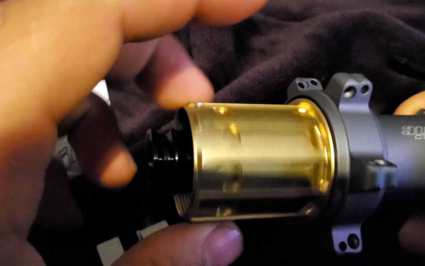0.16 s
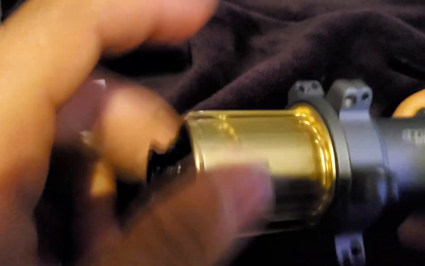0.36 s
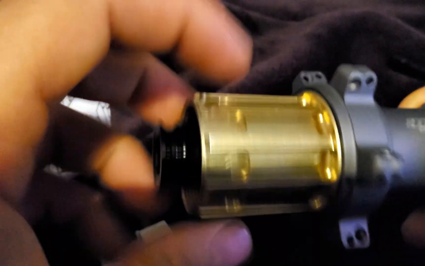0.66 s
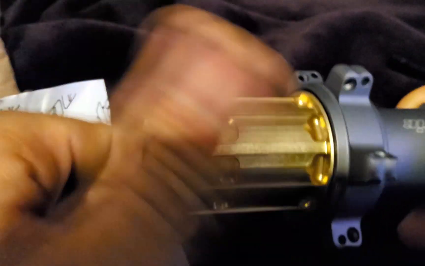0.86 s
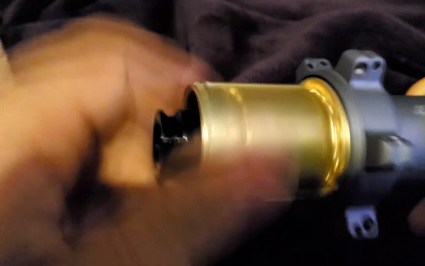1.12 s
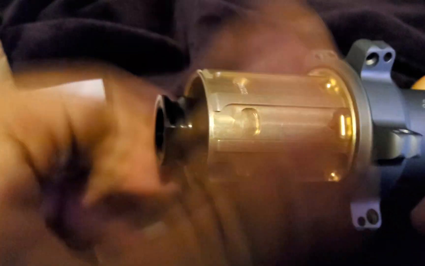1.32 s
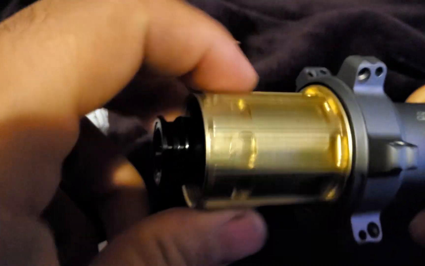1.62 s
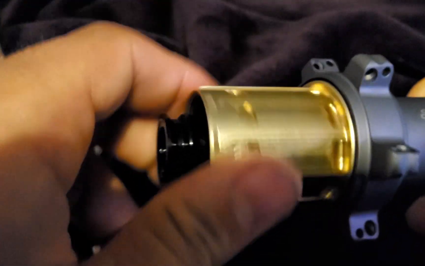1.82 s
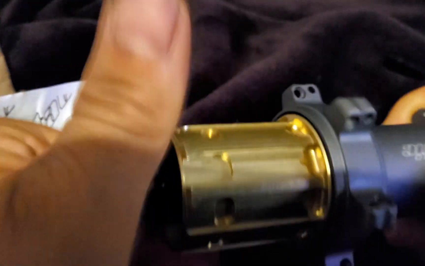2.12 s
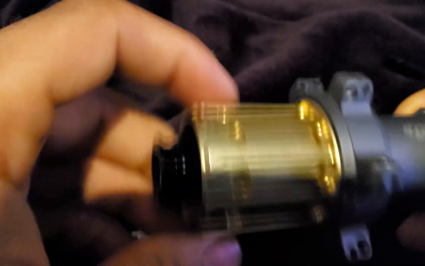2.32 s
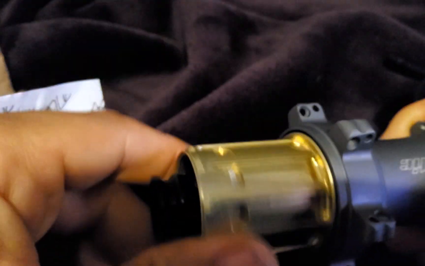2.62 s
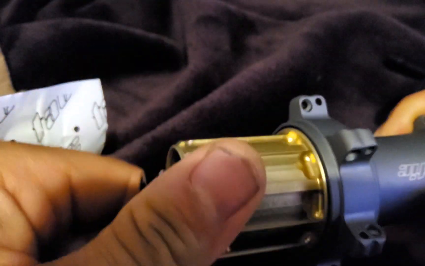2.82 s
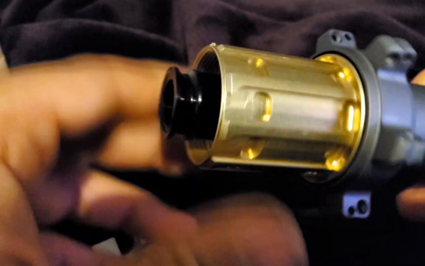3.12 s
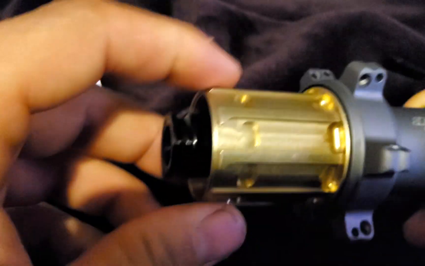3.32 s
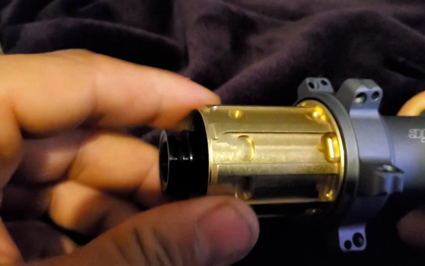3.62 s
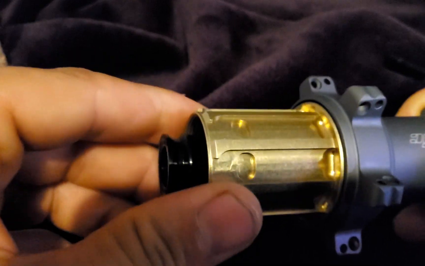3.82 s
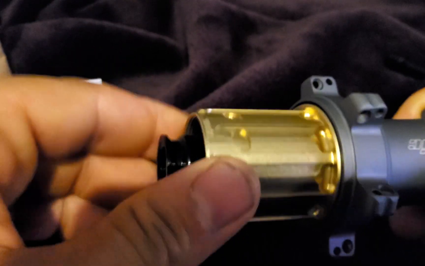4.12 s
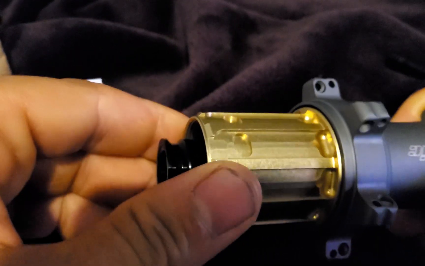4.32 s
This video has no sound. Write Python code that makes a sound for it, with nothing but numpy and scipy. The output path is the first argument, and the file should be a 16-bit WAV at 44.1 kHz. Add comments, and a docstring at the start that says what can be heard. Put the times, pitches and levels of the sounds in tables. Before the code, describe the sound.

Close, bright ratcheting of a bicycle hub: three quick zips, slower clicking runs, then a few isolated clicks, over very faint low rumble.

```python
"""A bicycle freehub is turned by hand in short strokes, close to a stereo microphone in a small soft room.
Every tooth lets the pawls snap home: a broad crack and metal rings last a few milliseconds, while the hollow
of hub and hand answers with a duller knock, two decaying sines. Fingers brush the hub as puffs of noise.
The room adds two early echoes and a short tail of fading noise; rumble, hiss and a low hum sit underneath."""
import sys
import numpy as np
from scipy import signal
from scipy.fft import rfft, irfft
from scipy.io import wavfile

SR = 44100
rng = np.random.default_rng(int(sys.argv[2]) if len(sys.argv) > 2 else 0)


def boost_factor(decibels):
    """Convert a level in decibels to a linear amplitude factor."""
    exponent = np.asarray(decibels, float) / 20
    return 10 ** exponent


def generate_wav(signal):
    """Clip the signal to [-1, 1] and save it as 16-bit WAV at the path in sys.argv[1]."""
    frames = np.transpose(np.atleast_2d(signal))
    scaled = np.clip(frames, -1, 1) * 32767
    pcm = np.round(scaled).astype(np.int16)
    wavfile.write(sys.argv[1], SR, pcm)


N = 196591  # length [samples]
RING_LENGTH = 1024  # length of one click [samples]
SIDE = np.array([.5, -.5])  # left and right share of a left-right difference
METAL_T60_S = 0.0045  # grease and fingers damp the metal at once

# speed of the freehub, one curve a stroke: (time [s], speed [teeth per s])
STROKE_SPEEDS = [
    [(0.322, 83.3), (0.358, 48.3), (0.39, 85.3), (0.398, 90.3), (0.438, 245.8), (0.446, 171.1),
     (0.4878, 46.3)],
    [(0.7715, 6.0), (0.7775, 170.9), (0.7875, 89.8), (0.8295, 355.3), (0.8455, 218.3), (0.8748, 5.5)],
    [(1.1461, 103.7), (1.1681, 160.5), (1.2001, 404.7), (1.2061, 313.0), (1.2141, 334.7), (1.2359, 88.1)],
    [(1.6217, 60.7), (1.6737, 31.7), (1.7337, 67.1), (1.7667, 38.7)],
    [(1.807, 33.4), (1.847, 68.1), (1.883, 46.6), (1.923, 70.1), (1.955, 95.9), (1.987, 66.2),
     (2.007, 82.0), (2.099, 111.4), (2.1218, 79.9)],
    [(2.4669, 58.0), (2.5109, 75.2), (2.5349, 37.4), (2.5509, 44.6), (2.6349, 41.6), (2.6869, 23.1),
     (2.7069, 66.0), (2.7149, 36.2), (2.7589, 32.4), (2.7989, 55.8), (2.8509, 116.6), (2.8943, 9.7)],
    [(3.4526, 44.0), (3.4926, 84.2), (3.536, 32.6)],
]
# force of each stroke, before build-up, speed and scatter:
# (snap level at the start [dB], snap level at the end [dB], knock level at the usual speed [dB])
STROKE_FORCES = [(-13, -9.5, -9), (-14.5, -10, -10.5), (-15, -13.5, -10.5), (-10.5, -13.5, -11.5),
                 (-10.5, -6.5, -12.5), (-6.5, -5, -12), (-11.5, -8.5, -11)]
# build-up of each stroke: (weakness of the first tooth [dB], time constant of the build-up [teeth])
STROKE_STARTS = [(3, 1.5), (4.5, 3.3), (11, 2.1), (5.6, 0.37), (0.048, 1.1), (5, 1.7), (3.2, 1.17)]
# teeth eased over one by one: (time [s], snap level [dB], knock level [dB])
EASED_TEETH = [(0.234, -22.5, -19), (0.2841, -17, -11.5), (3.7224, -20.5, -19), (3.7301, -21.5, -15),
               (3.7388, -17.5, -13), (3.756, -9.5, -14), (3.958, -18.5, -18.5), (4.1565, -26.5, -15.5),
               (4.1722, -17.5, -11.5), (4.1987, -13.5, -12)]
USUAL_TEETH_PER_S, SLOWEST_TEETH_PER_S = 100, 30
# per doubling of speed the knock grows while the snap has less time to seat
SNAP_DB_PER_OCTAVE, KNOCK_DB_PER_OCTAVE = -0.74, 1
# tooth to tooth scatter at the usual speed; it grows with speed
SCATTER_DB, SCATTER_POWER = 1.78, 0.05


def teeth():
    """A tooth passes whenever the summed speed reaches a whole number; returns time, speed and levels per tooth."""
    rows = []
    for curve, force, start in zip(STROKE_SPEEDS, STROKE_FORCES, STROKE_STARTS):
        first_db, last_db, stroke_knock_db = force
        start_db, start_teeth = start
        knots, rate = np.transpose(curve)
        t = np.arange(knots[0], knots[-1], 1 / SR)
        turned = np.cumsum(np.interp(t, knots, rate)) / SR
        tooth = np.arange(int(turned[-1]) + 1)
        times = np.interp(tooth, turned, t)
        weak_db = -start_db * np.exp(-tooth / start_teeth)
        stroke_snap_db = np.linspace(first_db, last_db, len(tooth))
        rows += zip(times, stroke_snap_db + weak_db, stroke_knock_db + weak_db, np.ones(len(tooth)))
    rows += [row + (0,) for row in EASED_TEETH]
    # swung is 1 for the teeth of a stroke, 0 for eased ones, which keep their levels
    s, snap_db, knock_db, swung = np.transpose(sorted(rows))
    gaps = np.diff(s, prepend=0, append=N / SR)
    speed = np.maximum(2 / (gaps[1:] + gaps[:-1]), SLOWEST_TEETH_PER_S)
    octaves = np.log2(speed / USUAL_TEETH_PER_S)
    scatter_db = SCATTER_DB * 2 ** (SCATTER_POWER * octaves) * rng.standard_normal((len(s), 2)).T
    snap_db = snap_db + swung * (SNAP_DB_PER_OCTAVE * octaves + scatter_db[0])
    knock_db = knock_db + swung * (KNOCK_DB_PER_OCTAVE * octaves + scatter_db[1])
    return s, octaves, snap_db, knock_db


# rings of the metal, before drift and colour:
# (frequency [Hz], level relative to the snap [dB], phase by which left leads [rad])
METAL_RINGS = [(2333, -12, 2.5), (4060, -10, -1), (4374, -1.5, 0.73), (5263, 4, -1.65), (6080, 1, -1),
               (6828, 5.5, -1.04), (8680, -2.5, 2.5), (9956, -3, 4), (10870, -6.5, 4), (11940, -7, 6.5),
               (13490, -8.5, 2.94), (13300, -7, -2), (16600, -6.5, -3)]
PAWL_SPREAD_S = 0.00018  # the pawls land one after another, so the ring swells
APART = 0.55  # phase drift opposed between the microphones, relative to the shared drift


def metal_rings(snap_db, pan_db, low_db, upper_db, top_db):
    """The struck metal rings at its own frequencies, each a swelling and quickly damped sine."""
    count = len(snap_db)
    metal = np.zeros((2, count, RING_LENGTH))
    for hz, level_db, lead in METAL_RINGS:
        if hz < 4800:
            shade_db = low_db
        elif hz < 6100:
            shade_db = 0
        elif hz < 7800:
            shade_db = upper_db
        else:
            shade_db = top_db
        # one tooth is much like the next: strength, phase and pitch drift as the hub turns
        spread_db = 2 * wander(count)
        turn = .8 * wander(count)
        pitch = hz * (1 + .02 * wander(count))
        for ch in range(2):
            gain = boost_factor(snap_db + level_db + shade_db + spread_db[:, ch] + pan_db * SIDE[ch])
            phase = lead * SIDE[ch] + turn[:, 0] + APART * 2 * SIDE[ch] * turn[:, 1]
            metal[ch] += gain[:, None] * rings(pitch[:, 0], METAL_T60_S, phase, PAWL_SPREAD_S)
    return metal


def crack(snap_db, pan_db):
    """The bare impact: a broad burst of noise before the rings build up."""
    fade = boost_factor(-60 * np.arange(RING_LENGTH) / SR / 0.00093)  # t60 0.93 ms
    noise = rng.standard_normal((2, len(snap_db), RING_LENGTH))
    burst = in_bands(noise * fade, low_hz=3700, high_hz=17500)
    return boost_factor(-5 + snap_db + pan_db * SIDE[:, None])[:, :, None] * burst


HOLLOW_HZ, HOLLOW_HZ_PER_OCTAVE = 1531.4, 120  # pitch at the usual speed, rise per doubling of speed


def hollow_knock(octaves, knock_db, pan_db):
    """The hollow of hub and hand answers each snap with two dull rings that rise in pitch with speed."""
    knock = np.zeros((2, len(octaves), RING_LENGTH))
    hollow_hz = HOLLOW_HZ + HOLLOW_HZ_PER_OCTAVE * octaves
    # as the hollow's pitch rises its two short rings join into one long one
    joined = np.clip((hollow_hz - 1400) / 260, 0, 1)
    t60 = 0.008 + 0.014 * joined
    for ch in range(2):
        gain = boost_factor(knock_db + pan_db * SIDE[ch])[:, None]
        for offset, level_db in ((-.15, -1.4), (.17, -1.1)):
            hz = hollow_hz * (1 + offset * (1 - joined))
            phase = -.45 * SIDE[ch] - 3.7 * offset
            knock[ch] += boost_factor(level_db) * gain * rings(hz, t60, phase, rise=0.00032)
    return knock


def hub_push(knock_db, pan_db):
    """The whole hub jolts in the hand: a faint dull push at 200 Hz."""
    push = np.zeros((2, len(knock_db), RING_LENGTH))
    for ch in range(2):
        gain = boost_factor(-31.5 + knock_db + pan_db * SIDE[ch])[:, None]
        push[ch] = gain * rings(200.0, 0.012, 1.5 * SIDE[ch], rise=0.00033)
    return push


# direction and colour of the metal as the hand moves round the hub: (time [s], left minus right [dB],
# level of the low rings [dB], level of the upper rings [dB], level of the top rings [dB])
HAND_COLOUR = [(0.3, -5, 5.5, -6, -2.5), (0.451, -3, 1.5, -14, 1.5), (0.79, 0, 7, -10.5, 5),
               (0.865, -3, 1.5, -1.5, 2.5), (1.148, -6, 9, -9.5, -9), (1.2, -0.5, 5.5, -5, 7),
               (1.699, 0.5, 5, -10, 5), (1.76, -3, 5, -1.5, 8), (1.9, -5, -5, -4.5, -1.5),
               (2.118, -3, 2.5, -9.5, 3.5), (2.47, -2.5, 0.5, -15, 6.5), (2.601, -4.5, -10, -2, 1.5),
               (2.752, -0.5, -5, -7.5, -1), (2.83, -0.5, 2, -10.5, 4), (3.457, -4, 2.5, -7.5, 4),
               (3.73, -3, 2, 0, -5), (3.962, -0.5, -3, -2.5, 2.5), (4.18, -2, 7.5, 1, 4)]


def ratchet():
    """Each click sets the metal and the hollow ringing; returns what the microphones and what the walls receive."""
    s, octaves, snap_db, knock_db = teeth()
    colour = np.transpose(HAND_COLOUR)
    pan_db, low_db, upper_db, top_db = (np.interp(s, colour[0], c) for c in colour[1:])
    metal = metal_rings(snap_db, pan_db, low_db, upper_db, top_db) + crack(snap_db, pan_db)
    knock = hollow_knock(octaves, knock_db, pan_db)
    push = hub_push(knock_db, pan_db)
    # a small body radiates little bass
    near = in_bands(lay_out(s, metal + knock), low_hz=631, high_hz=16400) + lay_out(s, push)
    # summed over all directions the separate rings blur into one short crack
    blur = boost_factor(-60 * np.arange(RING_LENGTH) / SR / METAL_T60_S)
    around = lay_out(s, metal * blur + boost_factor(-3) * knock)
    return near, around


# fingers tapping or brushing the hub: (time [s], peak level before panning [dB],
# time from the peak to 1/e before filtering [s], low edge [Hz], high edge [Hz])
FINGER_TOUCHES = [(3.0735, -53, .005, 900, 6000), (3.5954, -23, .0004, 400, 9000),
                  (3.792, -52, .003, 300, 1000), (4.4345, -45, .0009, 700, 15000)]


def touches():
    """Each touch of skin on the hub is a short puff of band-limited noise, slightly to the right."""
    out, t = np.zeros(N), np.arange(N) / SR
    for s, level_db, length, low_hz, high_hz in FINGER_TOUCHES:
        swell = np.exp(-((t - s) / length) ** 2)
        puff = in_bands(rng.standard_normal(N) * swell, low_hz, high_hz)
        out += boost_factor(level_db) * puff / np.abs(puff).max()
    return out * boost_factor(np.array([[-1.2], [1.2]]))


# room tail: (frequency [Hz], decay time t60 [s], starting level of the fade [dB])
ROOM_TAIL = [(400, 0.2, -38.5), (1560, 0.24, -43), (2850, 0.16, -28), (4900, 0.27, -42), (12000, 0.15, -34)]
# early reflections: (delay [s], left level [dB], right level [dB])
EARLY_ECHOES = [(.0021, -14.5, -16), (0.0126, -20.5, -33.5)]
# nearby cloth and hands scatter a little before the walls answer
EARLY_DB, EARLY_S = -7, 0.0037


def room(near, around):
    """Two early echoes, then a diffuse tail that sets in fully after 9 ms and dies band by band."""
    t = np.arange(SR // 2) / SR
    hz, t60, level_db = np.transpose(ROOM_TAIL)
    echoes, tail = np.zeros((2, 2, len(t)))
    edges = np.geomspace(300, 18000, 10)
    onset = np.where(t > .009, 1, boost_factor(EARLY_DB) * (t > EARLY_S))
    for low, high in zip(edges, edges[1:]):
        mid = np.sqrt(low * high)
        fade = boost_factor(at_hz(mid, hz, level_db) - 60 * t / at_hz(mid, hz, t60))
        tail += in_bands(rng.standard_normal(tail.shape), low, high) * fade * onset
    for delay, left_db, right_db in EARLY_ECHOES:
        echoes[:, round(delay * SR)] = boost_factor(np.array([left_db, right_db]))
    reflected = signal.fftconvolve(near, echoes, axes=1)
    diffuse = signal.fftconvolve(around, tail, axes=1)
    return (reflected + diffuse)[:, :N]


# spectrum shape of rumble and hiss: (frequency [Hz], relative power density [dB])
FLOOR_SHAPE = [(25, -38.5), (55, -19.5), (150, -30), (350, -41.5), (600, -51), (16000, -68)]
FLOOR_DB = -67.5  # rms of rumble and hiss together
# hum of a distant appliance: (frequency [Hz], rms level [dB])
APPLIANCE_HUM = [(89, -65), (185, -79)]
HUM_WIDTH_HZ = 5  # standard deviation of each hum line


def background():
    """Rumble largely alike in both microphones, hiss unrelated, and narrow wavering hum, all shaped noise."""
    hz = np.fft.rfftfreq(N, 1 / SR) + 1  # the offset avoids log of zero
    mid, side = rfft(rng.standard_normal((2, N)))
    alike = at_hz(hz, [150, 900], [.8, 0])
    power = boost_factor(2 * at_hz(hz, *np.transpose(FLOOR_SHAPE)))
    power *= boost_factor(2 * FLOOR_DB) / np.mean(power)
    for hum_hz, level_db in APPLIANCE_HUM:
        line = np.exp(-.5 * ((hz - hum_hz) / HUM_WIDTH_HZ) ** 2)
        power += boost_factor(2 * level_db) * line / np.mean(line)
    both = np.sqrt((1 + alike) / 2) * mid + np.sqrt((1 - alike) / 2) * side * [[1], [-1]]
    return irfft(np.sqrt(power) * both, N)


def rings(hz, t60, lead, rise):
    """One row of inverted, decaying sine per click, swelling with time constant rise [s]."""
    t = np.arange(RING_LENGTH) / SR
    hz, t60, lead = (np.reshape(v, (-1, 1)) for v in (hz, t60, lead))
    swing = -np.sin(2 * np.pi * hz * t + lead)
    return swing * boost_factor(-60 * t / t60) * (1 - np.exp(-t / rise))


def wander(count):
    """Chance that drifts over several clicks, two independent columns; spread about 1."""
    return signal.lfilter([.53], [1, -.85], rng.standard_normal((count + 20, 2)), axis=0)[20:]


def lay_out(s, pulses):
    """Put each click's sound at its time."""
    out = np.zeros((2, N + RING_LENGTH))
    for k, i in enumerate(np.round(s * SR).astype(int)):
        out[:, i:i + RING_LENGTH] += pulses[:, k]
    return out[:, :N]


def in_bands(x, low_hz, high_hz):
    """Band-pass made from a second-order Butterworth design."""
    return signal.sosfilt(signal.butter(2, [low_hz, high_hz], "band", fs=SR, output="sos"), x)


def at_hz(hz, points_hz, values):
    """Read a table on a log-frequency axis."""
    return np.interp(np.log(hz), np.log(points_hz), values)


def scene():
    """The hub, the fingers, the room and the background."""
    near, around = ratchet()
    fingers = touches()
    reverb = room(near + fingers, around + boost_factor(-11.5) * fingers)
    return near + fingers + reverb + background()


def low_pass(x):
    """Removes everything above the highest recorded frequency."""
    return signal.sosfilt(signal.butter(12, 16990, fs=SR, output="sos"), x)


def record(dry):
    """The loudest peaks are flattened at 0.8 of full scale, then the top treble is cut."""
    flattened = np.clip(dry, -.8, .8)
    treble_cut = signal.cheby2(10, 60, 17000, fs=SR, output="sos")
    mix = signal.sosfilt(treble_cut, flattened)
    return low_pass(mix)


dry = scene()
out = record(dry)
generate_wav(out)
```